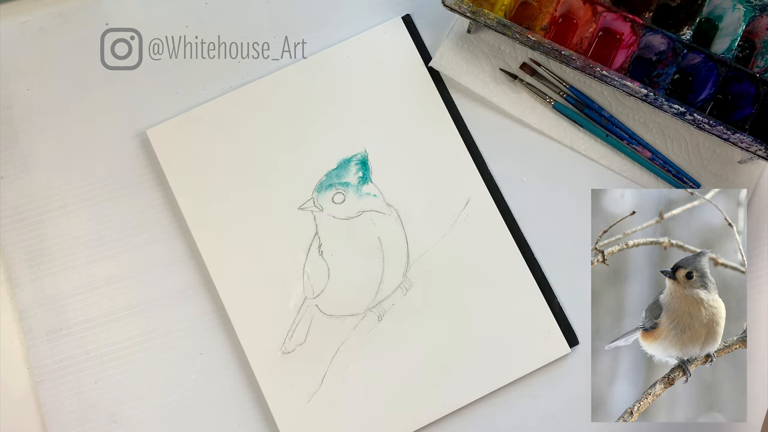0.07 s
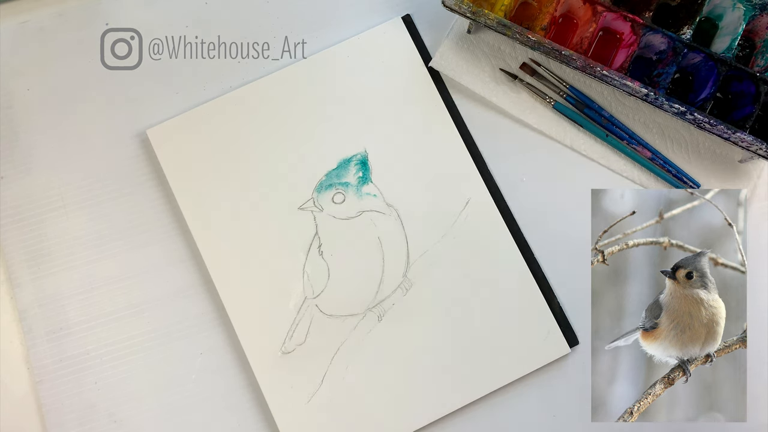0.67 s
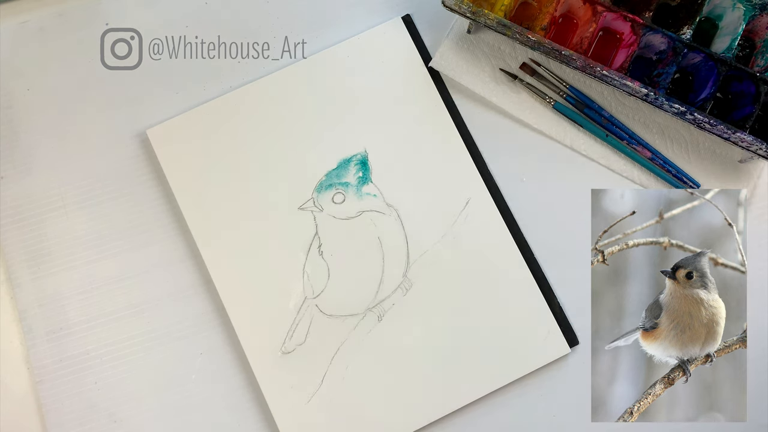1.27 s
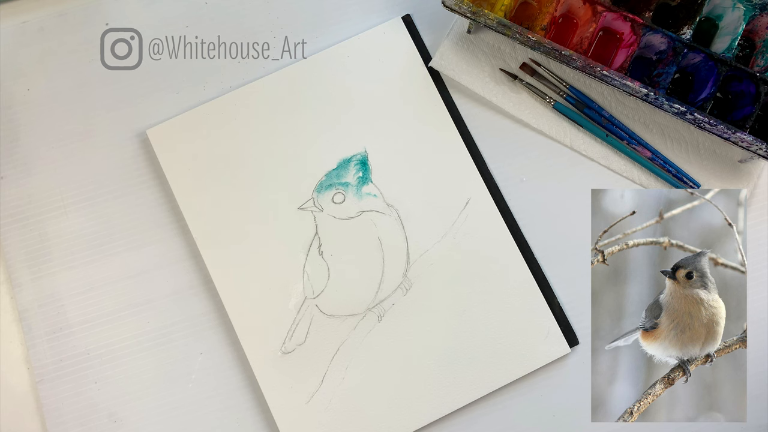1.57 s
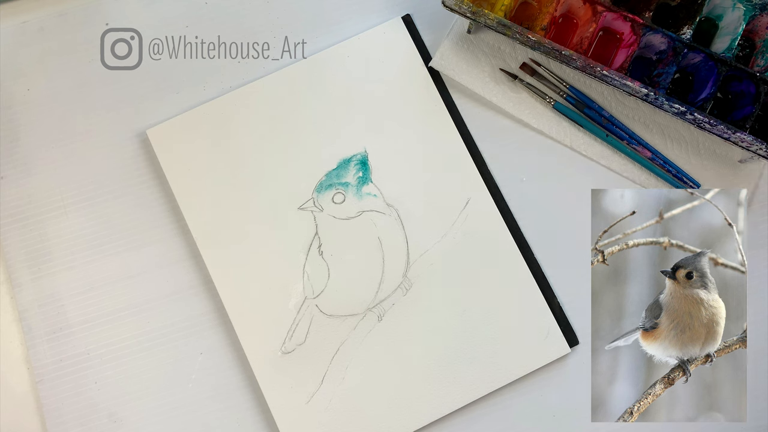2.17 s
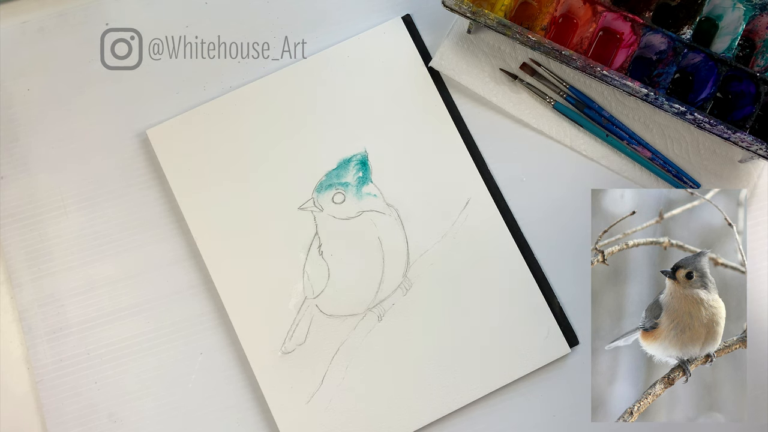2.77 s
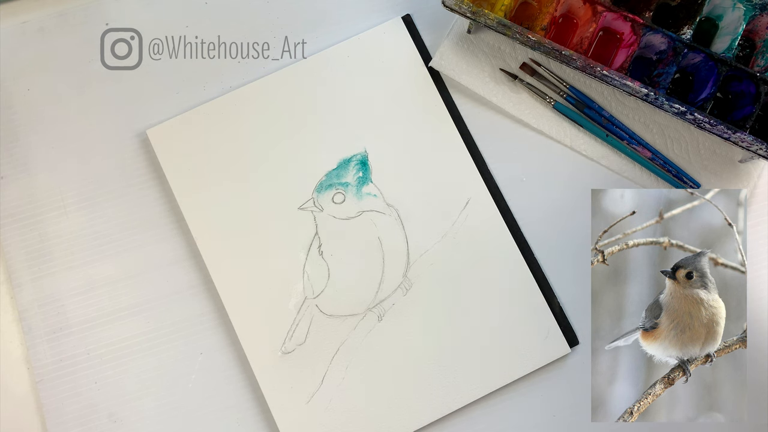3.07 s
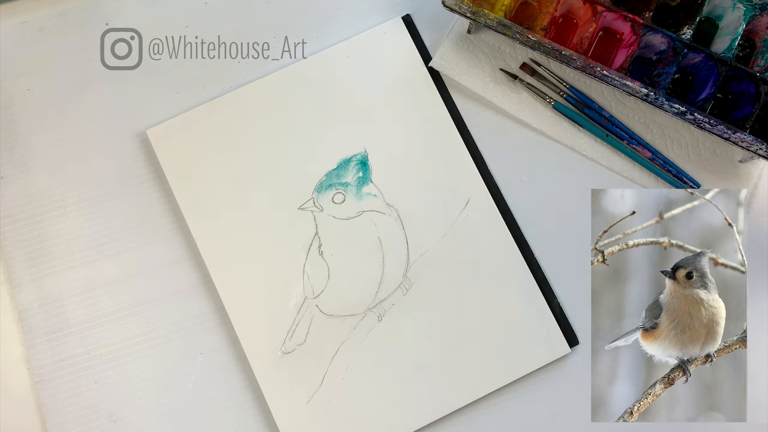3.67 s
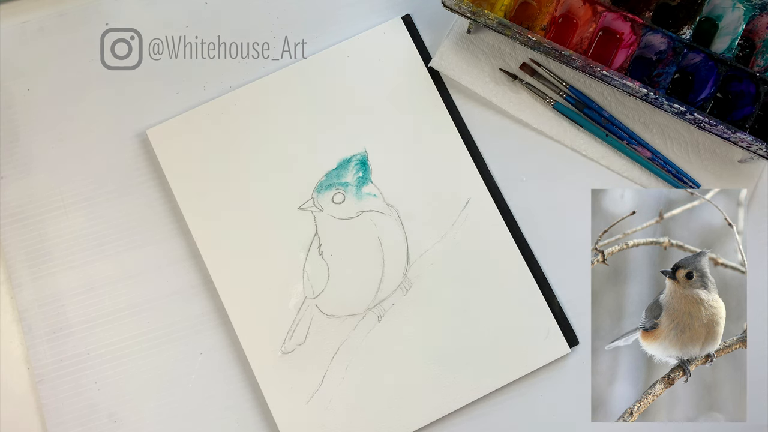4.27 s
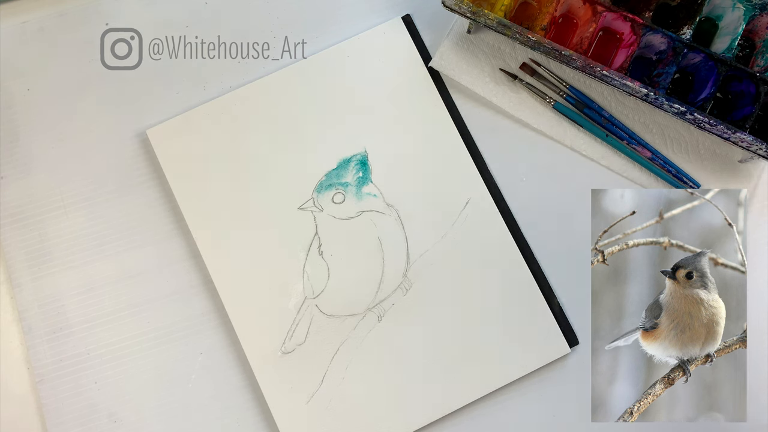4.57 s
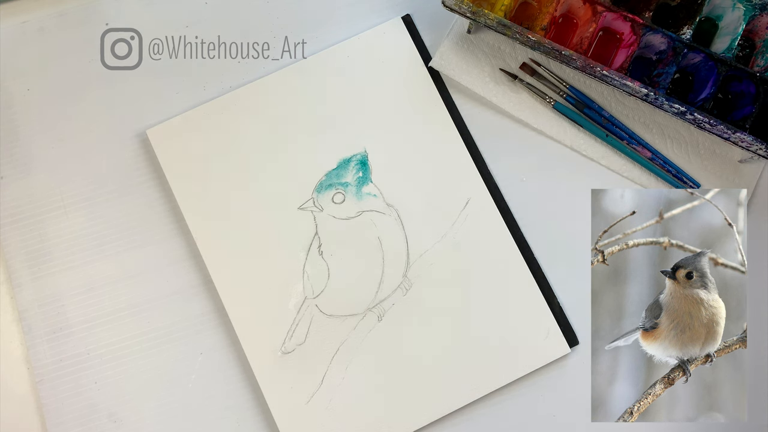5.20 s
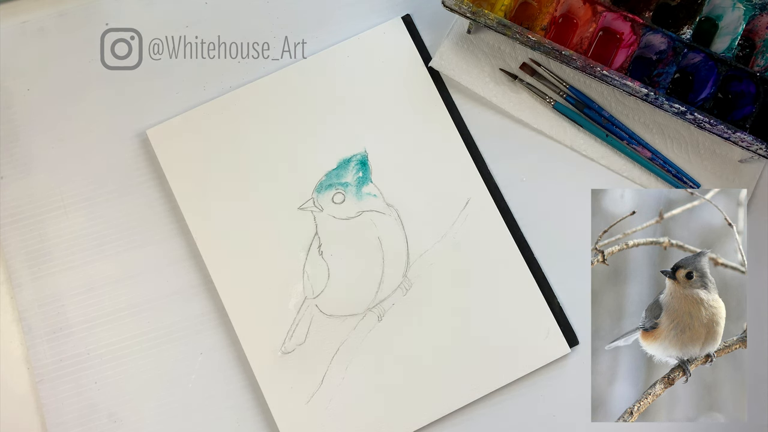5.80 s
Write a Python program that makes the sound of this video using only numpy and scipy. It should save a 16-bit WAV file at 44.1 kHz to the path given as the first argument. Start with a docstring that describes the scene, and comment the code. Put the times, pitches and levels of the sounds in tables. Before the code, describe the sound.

In a small, quiet room, a wet paintbrush swishes softly in a plastic palette, close to a stereo microphone. Its metal collar ticks and briefly squeaks against the plastic, among light scuffs on the desk. Something is set down with a louder knock, and a hollow paint box bumps as it is nudged along. The brush then dabs back in and stirs quickly over a faint hum.

```python
"""Wet bristles swish in a plastic palette: watercolour being mixed on a desk in a small, quiet room,
close to a stereo microphone. A sleeve glides over the desk, and the ferrule ticks and squeaks on
the plastic. Something is set down with a knock that rings the desk, and the hollow paint box rocks
as it is nudged along. Then the brush dabs back into the well and stirs, its hairs hissing as they
slip. Soft air and a faint mains hum lie underneath."""
import sys
import numpy as np
from scipy import signal
from scipy.fft import rfft, irfft, next_fast_len
from scipy.io import wavfile

SR = 44100
rng = np.random.default_rng(int(sys.argv[2]) if len(sys.argv) > 2 else 0)


def store_pcm(level_fs):
    """Save levels as 16-bit WAV."""
    pcm = np.round(np.clip(level_fs, -1, 1) * 32767).astype(np.int16)
    wavfile.write(sys.argv[1], SR, np.atleast_2d(pcm).T)


N = 266408
TIME = np.arange(N) / SR

# still air in the room: (frequency [Hz], spectral density [dB])
AIR_COLOUR = [(20, -52), (33, -38), (38, 1), (60, -2.5), (100, -8), (170, -10.5), (260, -16), (400, -22),
              (630, -29), (1000, -34), (1700, -33), (2600, -38), (4000, -40), (10000, -43), (15500, -44),
              (16500, -57)]
# mains hum: (frequency [Hz], rms level [dB])
MAINS_HUM = [(59.2, -64), (177.6, -73.5)]
# diffuse sound at the microphone: (frequency [Hz], left-right likeness [0-1])
STEREO_LIKENESS = [(150, .99), (350, .6), (700, .1), (2500, .25), (4500, .75), (16000, .8)]
# single brush strokes: (middle [s], half length [s], well level [dB], bristle level [dB])
BRUSH_STROKES = [(0.153, 0.021, -47.5, -50.5), (0.352, 0.014, -50, -54.5), (1.191, 0.024, -57.5, -54.5),
                 (1.334, 0.022, -65, -70), (1.713, 0.027, -89, -61.5), (1.788, 0.062, -80, -63.5),
                 (1.943, 0.015, -59.5, -63), (1.999, 0.032, -67, -61), (3.15, 0.04, -69, -60),
                 (3.239, 0.021, -62.5, -45.5), (3.285, 0.026, -60, -47.5), (3.452, 0.009, -70, -56),
                 (4.986, 0.005, -51, -56), (5.02, 0.018, -50, -54), (5.056, 0.007, -56, -51.5)]
# stirring, one row a turn: (well level [dB], bristle level [dB], flick delay [s], flick hiss [dB])
STIR_TURNS = [(-56, -73, 0.04, -62.5), (-57, -59.5, 0.0584, -53.5), (-62, -62.5, 0.0497, -51),
              (-64.5, -63.5, 0.0553, -53.5), (-61, -64, 0.0486, -58.5), (-84, -59.5, .05, -60)]
# hollow of the well under the tuft: (frequency [Hz], width [Hz], level [dB])
WELL_MODES = [(1085, 233, -0.5), (1273, 485, -1.5), (1630, 444, -0.5), (1935, 453, -5)]
# bristle friction: (frequency [Hz], spectral density [dB])
BRISTLE_COLOUR = [(1500, -9.5), (2350, 0), (3000, -7), (3700, -7), (5000, 0), (6500, 2.5), (8000, -8.5),
                  (10000, -3.5), (12000, -0.5), (14000, 0.5), (15600, 4), (16300, -23)]
# the arm reaching across the desk: (start [s], hold [s], level [dB])
SLEEVE_GLIDES = [(0.63, 0.13, -59), (3.72, 0.01, -76), (4.55, 0.3, -66.5)]
# cloth friction: (frequency [Hz], spectral density [dB])
SLEEVE_COLOUR = [(120, 2), (330, 4), (650, -11), (850, -5), (1030, -10), (1280, 0), (1500, -5),
                 (2400, -7.5), (2750, -20), (7000, -32)]
# things slid over the desk: (start [s], hold [s], level [dB])
SLIDES = [(1.001, 0.5, -54), (1.94, 0.014, -50), (4.117, .44, -49.5), (4.595, 0.36, -50)]
# their rumble: (frequency [Hz], spectral density [dB])
SLIDE_COLOUR = [(50, -12.5), (110, 3), (155, -6.5), (195, 2), (260, -4), (330, -6.5), (420, -10),
                (540, -24), (900, -23.5)]
# scuffs and clacks of things handled on the desk: (time [s], level [dB], fade [dB/s], treble cut [Hz])
SCUFFS = [(1.01, -50, 160, 6000), (1.166, -55, 90, 4500), (1.324, -60, 115, 5000), (1.538, -57, 143, 7000),
          (2.663, -53.5, 95, 3400), (2.881, -48.5, 230, 4500), (3.228, -55, 110, 3100),
          (3.9754, -37.5, 234, 6000), (4.297, -49, 250, 1700), (4.438, -59, 300, 2900),
          (4.512, -59, 260, 2700)]
# their friction: (frequency [Hz], spectral density [dB])
SCUFF_COLOUR = [(200, -13), (400, -0.5), (800, -7), (1050, -2.5), (1450, -1.5), (2300, -6), (2850, -9),
                (3500, -1.5), (4500, -5.5), (6500, -18.5), (9000, -48), (16000, -34)]
# ferrule on the palette: (time [s], level [dB], brightest pitch [Hz], tray thud [dB])
FERRULE_TICKS = [(1.013, -38, 2700, -50), (1.164, -49, 1500, -59), (1.188, -45, 3500, -60),
                 (1.27, -46, 3200, -54), (1.325, -47, 3300, -59), (1.3785, -38.5, 3400, -51),
                 (1.402, -46, 2600, -52), (1.469, -45, 1500, -62), (1.5443, -37, 4000, -68),
                 (1.7535, -26, 7800, -54), (1.94, -33.5, 10900, -49.5), (1.985, -26, 8000, -46),
                 (2.4917, -23, 9500, -47), (2.6673, -28, 8000, -45), (2.7504, -36, 4600, -49),
                 (2.7825, -48, 2980, -59), (2.831, -33.5, 9700, -56.5), (2.8885, -26, 9000, -44),
                 (2.9307, -23.5, 15000, -70), (3.1045, -33.5, 12900, -74), (3.1632, -39, 15500, -77),
                 (3.1813, -34.5, 15700, -82), (3.228, -31, 15000, -66), (3.288, -32, 15500, -66),
                 (3.3094, -31, 15500, -58), (3.4566, -39, 11000, -68), (3.5006, -36, 6500, -52),
                 (3.978, -27, 3200, -34), (3.9965, -29, 3400, -40), (4.0034, -33, 4200, -38),
                 (4.984, -39, 4700, -60), (5.0183, -22.5, 6000, -52), (5.241, -45, 15100, -56),
                 (5.557, -40, 9000, -70), (5.7343, -38, 14000, -71), (5.924, -31, 10500, -65)]
# plastic under a tick: (frequency [Hz], width [Hz], level [dB])
PLASTIC_MODES = [(390, 150, 5), (783, 260, 0), (1475, 460, 2), (2260, 800, 2.5), (3550, 1000, 3.5),
                 (4690, 1820, 5), (6640, 1730, 1.5), (8360, 2000, 0.5), (11270, 1800, 0),
                 (13640, 2500, 3.5), (15200, 1200, 1)]
# faint after-ring of the palette's tray: (frequency [Hz], level [dB], t60 [s])
TRAY_MODES = [(790, -19, .16), (1147, -21, .15), (1510, -26, .12), (2124, -22, 0.17), (2320, -22, 0.2),
              (3200, -23, 0.12), (3620, -22, .12), (4040, -23, .12)]
# blows on the desk: (time [s], level [dB], treble cut [Hz], hand grip [0 free, about 1 firm])
DESK_KNOCKS = [(1.225, -44.5, 230, 0.32), (1.475, -40, 74, 0), (2.886, -30.5, 560, 1.03),
               (3.978, -27.5, 2820, 0.19), (3.985, -21.5, 414, 0.08), (4.0069, -25, 377, 0.05),
               (4.047, -27.5, 380, 0.03), (4.299, -33, 350, 0.45), (4.445, -36, 310, 0.32),
               (4.513, -37, 420, .55)]
# ring of the desk: (frequency [Hz], level [dB], t60 [s])
DESK_MODES = [(80, -12, 0.7), (101, -7, 0.3), (134.5, -1.5, 0.22), (181, -1.5, 0.2), (206, -7, 0.12),
              (266.1, -10.5, 0.2), (324.5, -5, 0.19), (396, -10.5, 0.12), (530, -13, 0.14),
              (642, -10.5, 0.14), (721, -10, 0.14), (784, -15, 0.13), (1074, -9.5, 0.14),
              (1246, -11.5, 0.086), (1555, -15, 0.072), (1786, -11, 0.1), (2460, -8.5, 0.076),
              (3510, -10, 0.053)]
# ferrule slipping on plastic: (time [s], length [s], first pitch [Hz], last pitch [Hz], level [dB])
FERRULE_SLIPS = [(1.753, .003, 6700, 6300, -35), (1.9374, 0.0085, 3120, 2957, -37.5),
                 (1.954, 0.025, 2970, 3520, -41.5), (1.9843, 0.0033, 6410, 6260, -35),
                 (2.907, 0.0062, 6340, 5650, -36.5), (2.913, 0.0066, 7000, 5300, -33),
                 (2.931, .011, 7850, 5860, -30), (2.932, 0.011, 8600, 7080, -39),
                 (2.948, .015, 6620, 5280, -35), (2.973, 0.0142, 7430, 6400, -44),
                 (2.972, 0.024, 6310, 5870, -41), (2.996, .03, 5630, 5010, -49),
                 (4.11, 0.049, 3000, 4000, -55), (4.158, 0.089, 3800, 3360, -61)]
# paint box rocking on its feet: (time [s], level [dB], pitch [Hz])
BOX_BUMPS = [(4.302, -37, 225), (4.36, -40, 270), (4.446, -34, 240), (4.516, -34, 200), (4.541, -38, 200),
             (4.641, -41, 245), (4.69, -44, 215), (4.735, -41, 180), (4.82, -41, 140), (4.92, -39.5, 195)]
# wet tuft landing in the well: (time [s], level [dB], length [s])
TUFT_DABS = [(4.9822, -34, 0.009), (5.002, -37, 0.007), (5.017, -35, 0.004), (5.054, -42, 0.0056),
             (5.531, -52.5, 0.011), (5.708, -52, 0.013)]
# decay of the room: (frequency [Hz], t60 [s])
ROOM_DECAY = [(150, 0.52), (800, 0.52), (2000, 0.25), (5000, 0.2), (15000, 0.13)]
# reflections against the direct sound: (frequency [Hz], level [dB])
ROOM_LEVEL = [(100, -20), (400, -11), (1000, -5), (2500, -3), (5000, -9), (15000, -13)]
# further lag of the right microphone port behind the left: (frequency [Hz], phase [rad])
MIC_PORT_PHASE = [(380, 0), (700, -.8), (1000, -.7), (1400, -.2), (1900, .2), (2600, 1.0), (3200, .6),
                  (4000, 0)]


def from_db(db):
    """Decibels to gain."""
    return 10 ** (np.asarray(db) / 20)


def unit_rms(x):
    """Scale to rms 1."""
    return x / np.sqrt(np.mean(x ** 2) + 1e-20)


def at_hz(points, hz):
    """Read a table on a log-frequency axis."""
    table_hz, values = np.array(points).T
    return np.interp(np.log(np.maximum(hz, 1)), np.log(table_hz), values)


def cut(x, hz, kind, order=2):
    """Butterworth filter; kind names the part that passes."""
    sections = signal.butter(order, np.clip(hz, 10, .45 * SR), kind, fs=SR, output="sos")
    return signal.sosfilt(sections, x)


def coloured(x, spectrum):
    """Give a noise a smooth spectrum; rms 1."""
    size = next_fast_len(N)
    gain = from_db(at_hz(spectrum, np.arange(size // 2 + 1) * SR / size))
    return unit_rms(irfft(rfft(x, size) * gain, size)[..., :N])


def resonate(x, hz, width_hz):
    """One resonance with gain 1 at its peak."""
    radius = np.exp(-np.pi * width_hz / SR)
    feedback = [1, -2 * radius * np.cos(2 * np.pi * hz / SR), radius ** 2]
    return signal.lfilter(np.array([1, 0, -1]) * (1 - radius ** 2) / 2, feedback, x)


def drift(per_s):
    """A random wander that turns about per_s times a second; rms 1."""
    return unit_rms(np.interp(TIME * per_s, np.arange(N // 4), rng.standard_normal(N // 4)))


def grains(per_s, spread_db):
    """Tiny random slips of uneven size."""
    sizes = from_db(spread_db * np.minimum(rng.exponential(1, N), 4)) * rng.choice([-1, 1], N)
    return sizes * (rng.random(N) < per_s / SR)


def gesture(age, attack_s, hold_s, fade_db_per_s):
    """Gain by age in seconds: a straight rise, a hold, then an even fade."""
    loss_db = np.clip(fade_db_per_s * (age - attack_s - hold_s), 0, 200)
    return np.clip(age / attack_s, 0, 1) * from_db(-loss_db)


def add(out, start_s, sound):
    """Mix a sound in at its start time."""
    start = int(start_s * SR)
    out[start:start + len(sound)] += sound[:N - start]


def ringing(modes, t, detune):
    """One dying sine a row, each a little off its pitch at random."""
    return np.array([from_db(db - 60 * t / t60) * np.sin(2 * np.pi * hz * rng.normal(1, detune) * t)
                     for hz, db, t60 in modes])


def diffuse(size):
    """White noise from all round the microphone, alike left and right except in the midrange."""
    mid, side = rfft(rng.standard_normal((2, size)))
    alike = np.clip(at_hz(STEREO_LIKENESS, np.arange(len(mid)) * SR / size), 0, 1)
    return irfft(np.sqrt((1 + alike) / 2) * mid + np.sqrt((1 - alike) / 2) * side * [[1], [-1]], size)


def room_tone(air_db=-62.3, waver_db=1.3, swell_db=2.64):
    """Quiet air that wavers, most of all in its rumble, and a faint mains hum."""
    hum = sum(from_db(db) * np.sqrt(2) * np.sin(2 * np.pi * (hz * TIME + rng.random()))
              for hz, db in MAINS_HUM)
    air = from_db(air_db + waver_db * drift(per_s=6)) * coloured(diffuse(N), AIR_COLOUR)
    rumble = cut(air, 200, "low", order=1)
    swell = from_db(swell_db * drift(per_s=12)) - 1
    return air + swell * rumble + hum


def well(force):
    """The hollow of the palette answers between one and two kilohertz; rms 1."""
    rings = sum((-1) ** k * from_db(db) * resonate(force, hz, width)
                for k, (hz, width, db) in enumerate(WELL_MODES))
    return unit_rms(cut(cut(rings, 786, "high"), 3100, "low"))


def brush_strokes(well_trim_db=-1):
    """Hundreds of hairs slip over the plastic under uneven pressure: they hiss and sound the well."""
    well_gain, hiss_gain = np.zeros(N), np.zeros(N)
    for middle, half_s, well_db, hiss_db in BRUSH_STROKES + stirring():
        swell = 1 / (1 + ((TIME - middle) / half_s) ** 4)
        well_gain += from_db(well_db + well_trim_db) * swell
        hiss_gain += from_db(hiss_db) * swell
    pressure = from_db(1.3 * drift(per_s=130))
    hollow = well_gain * well(grains(per_s=3000, spread_db=2))
    hiss = hiss_gain * coloured(grains(per_s=2200, spread_db=4.6), BRISTLE_COLOUR)
    return pressure * (hollow + hiss)


def tip_skim(start_s=.56, level_db=-57):
    """The very tip of the brush skims the plastic with a thin, high hiss."""
    touch = gesture(TIME - start_s, attack_s=.02, hold_s=.022, fade_db_per_s=212)
    friction = coloured(rng.standard_normal(N), BRISTLE_COLOUR)
    return from_db(level_db) * touch * unit_rms(resonate(friction, hz=14100, width_hz=1300))


def sleeve(uneven_db=1.5):
    """Cloth fibres slip over the desk in a soft, dull swell."""
    speed = sum(from_db(db) * gesture(TIME - start, attack_s=.11, hold_s=hold, fade_db_per_s=45)
                for start, hold, db in SLEEVE_GLIDES)
    uneven = from_db(uneven_db * drift(per_s=35))
    return speed * uneven * coloured(grains(per_s=2500, spread_db=2.4), SLEEVE_COLOUR)


def desk_slides(trim_db=-2, wobble_db=-5):
    """Things judder over the desk with a hollow wobble."""
    pushes = [from_db(db + trim_db) * gesture(TIME - start, attack_s=.028, hold_s=hold, fade_db_per_s=70)
              for start, hold, db in SLIDES]
    judder = np.max(pushes, axis=0) * coloured(grains(per_s=560, spread_db=1), SLIDE_COLOUR)
    wobble = from_db(wobble_db) * resonate(judder, hz=245, width_hz=40)
    return cut(judder, 990, "low") + wobble


def scuffs_and_clacks(trim_db=-5, catch_db=3.5, ring_db=1):
    """Things handled on the desk give short scuffs and clacks, faintly ringing the palette's tray."""
    catching = from_db(trim_db + catch_db * drift(per_s=66))
    friction = catching * coloured(grains(per_s=700, spread_db=2.8), SCUFF_COLOUR)
    scuffs, t = np.full(N, 1e-18), TIME[:SR // 2]
    for start, db, fade, top_hz in SCUFFS:
        rub = cut(friction[int(start * SR):][:len(t)], top_hz, "low", order=3)
        add(scuffs, start, from_db(db) * gesture(t, attack_s=.0035, hold_s=0, fade_db_per_s=fade) * rub)
    tray = sum(resonate(scuffs, hz, width_hz=60) for hz, _, _ in TRAY_MODES)
    return scuffs + from_db(ring_db) * tray


def tick_db(hz, level_db, bright_hz, thud_db):
    """Low modes take the thud; the rest lose 8 dB an octave below the brightest pitch, 9 above it."""
    octaves = np.log2(hz / bright_hz)
    return thud_db if hz < 1000 else level_db + min(8 * octaves, -9 * octaves)


def ferrule_ticks(contact_s=.00021, chatter_s=.0074, chatter_db=-17.5, ring_db=-3):
    """A hard contact and a faint chatter ring the plastic; the tray rings on, its pitch set by the spot."""
    out, t = np.zeros(N), TIME[:2048]
    impact = np.exp(-t / contact_s) + from_db(chatter_db) * np.exp(-t / chatter_s)
    for start, *contact in FERRULE_TICKS:
        tray = from_db(ring_db) * ringing(TRAY_MODES, TIME[:SR // 4], detune=.025)
        force = impact * rng.standard_normal(len(t))
        for k, (hz, width, db) in enumerate(PLASTIC_MODES):
            mode = resonate(force, hz, width)
            gain = (-1) ** k * from_db(db + tick_db(hz, *contact))
            add(out, start, gain * mode / np.abs(mode).max())
        tray_gains = from_db([tick_db(hz, *contact) + rng.normal(0, 2) for hz, _, _ in TRAY_MODES])
        add(out, start, tray_gains @ tray)
    return cut(out, 204, "high")


def desk_knocks(rattle_db=-10, rattle_t60=.12, grip_db_per_s=294.5, side_db=-6.5):
    """Each blow rings the desk and rattles what lies on it; a gripping hand damps and thins the ring."""
    mid, side, t = np.zeros(N), np.zeros(N), TIME[:SR // 2]
    rattle_fade = from_db(rattle_db - 60 * t / rattle_t60)
    for start, db, top_hz, grip in DESK_KNOCKS:
        modes = ringing(DESK_MODES, t, detune=.012)
        damping = from_db(db - grip_db_per_s * grip * t)
        bass_cut_hz = 66 + 360 * grip ** 2
        for channel in (mid, side):
            desk = from_db(rng.normal(0, 2, len(modes))) @ modes   # every spot favours other modes
            rattle = rattle_fade * unit_rms(cut(rng.standard_normal(len(t)), [150, 3200], "band"))
            blow = cut(damping * (desk + rattle), top_hz, "low")
            add(channel, start, cut(blow, bass_cut_hz, "high"))
    spread = from_db(side_db) * cut(side, 330, "high")   # the higher modes spread sideways
    return cut(mid, 48, "high", order=4) + spread * [[-1], [1]]


def ferrule_squeaks(trim_db=-2.5, octave_db=-13, rise_share=.18, sag_db=7, release_db_per_s=1503):
    """The ferrule sticks and slips at an unsteady rate; each squeak glides and weakens as it goes."""
    out, t = np.zeros(N), TIME[:SR // 8]
    waver_hz = 380 * drift(per_s=1500)
    grip = from_db(trim_db + 4.33 * drift(per_s=290))
    for start, length, first_hz, last_hz, db in FERRULE_SLIPS:
        progress = np.minimum(t / length, 1)
        hz = first_hz + (last_hz - first_hz) * progress + np.interp(start + t, TIME, waver_hz)
        phase = 2 * np.pi * np.cumsum(hz) / SR
        rise = np.minimum(progress / rise_share, 1)
        fade = from_db(db - sag_db * progress - release_db_per_s * np.maximum(t - length, 0))
        add(out, start, rise * fade * (np.sin(phase) + from_db(octave_db) * np.sin(2 * phase)))
    return grip * out


def box_bumps(t60=.13, upper_ratio=1.55, upper_db=-9, upper_t60=.1):
    """Each bump rings the hollow of the paint box and one weaker mode above it."""
    out, t = np.zeros(N), TIME[:SR // 2]
    for start, db, hz in BOX_BUMPS:
        phase = 2 * np.pi * hz * t
        hollow = from_db(db - 60 * t / t60) * np.sin(phase)
        upper = from_db(db + upper_db - 60 * t / upper_t60) * np.sin(upper_ratio * phase)
        add(out, start, hollow + upper)
    return out


def brush_dabs():
    """The loaded tuft lands in the well in soft, short pushes."""
    push = np.zeros(N)
    for start, db, length in TUFT_DABS:
        age = TIME[:4096] / length
        add(push, start, from_db(db) * 2 * age * np.exp(1 - 2 * age))
    return push * well(rng.standard_normal(N))


def stirring(start_s=5.132, turn_s=.1875, sweep_half_s=.028, flick_half_s=.0056, flick_well_db=-59.5):
    """Each turn is a sweep through the well and a quick flick off the rim; rows as in BRUSH_STROKES."""
    rows = []
    for turn, (well_db, hiss_db, delay, flick_db) in enumerate(STIR_TURNS):
        middle = start_s + turn * turn_s
        rows.append((middle, sweep_half_s, well_db, hiss_db))
        rows.append((middle + delay, flick_half_s, flick_well_db, flick_db))
    return rows


def room_reflections(x, first_echo_s=.00067):
    """The small room answers from all sides, octave by octave; the treble dies first."""
    t, edges, tail = TIME[:SR // 2], np.geomspace(70, 18000, 9), 0
    for low, high in zip(edges, edges[1:]):
        hz = np.sqrt(low * high)
        decay = from_db(-60 * t / at_hz(ROOM_DECAY, hz)) * (t > first_echo_s)
        band = unit_rms(cut(diffuse(len(t)), [low, high], "band") * decay)
        unity_gain = np.sqrt(2 * (high - low) / SR / len(t))
        tail = tail + from_db(at_hz(ROOM_LEVEL, hz)) * unity_gain * band
    return signal.fftconvolve(x[None], tail, axes=1)[:, :N]


def scene():
    """Close to the desk in a small room: the palette dead centre, the desk slightly to the left."""
    palette = ferrule_ticks() + brush_strokes() + tip_skim() + brush_dabs() + ferrule_squeaks()
    desk = desk_knocks() + box_bumps() + desk_slides() + scuffs_and_clacks() + sleeve()
    direct = palette + desk * from_db([[.6], [-.6]])
    return direct + room_reflections(palette + desk.mean(axis=0)) + room_tone()


def record(dry, right_lag_s=10.3 / SR, lag_above_hz=2450, cutoff_hz=16700):
    """The stereo microphone: treble reaches its right port a little late, and the very top is cut."""
    hz = np.arange(N // 2 + 1) * SR / N
    treble_phase = 2 * np.pi * right_lag_s * np.maximum(hz - lag_above_hz, 0)
    phase = at_hz(MIC_PORT_PHASE, hz) + treble_phase
    right = irfft(rfft(dry[1]) * np.exp(-1j * phase), N)
    return cut(np.array([dry[0], right]), cutoff_hz, "low", order=24)


dry = scene()
out = record(dry)
store_pcm(out)
```